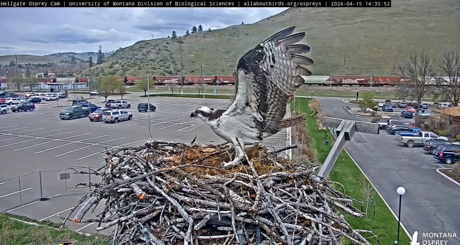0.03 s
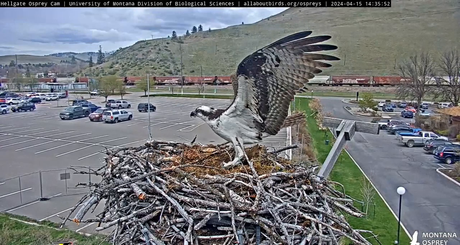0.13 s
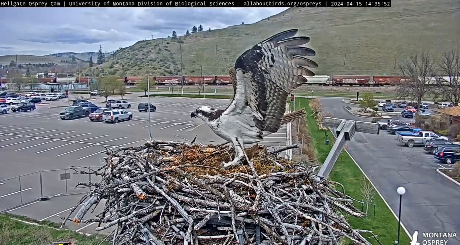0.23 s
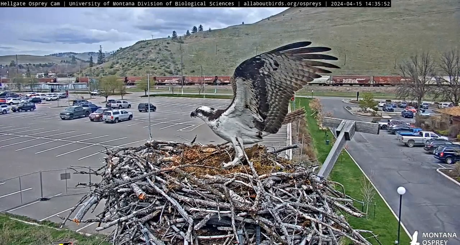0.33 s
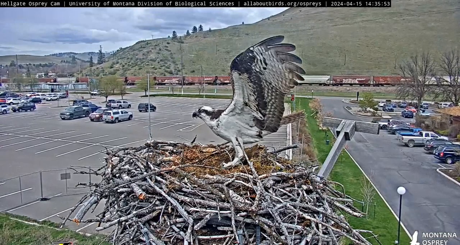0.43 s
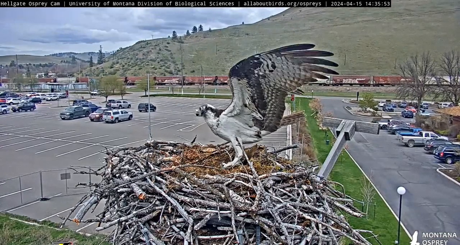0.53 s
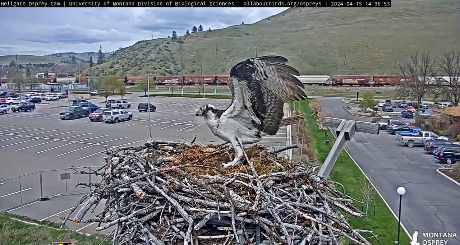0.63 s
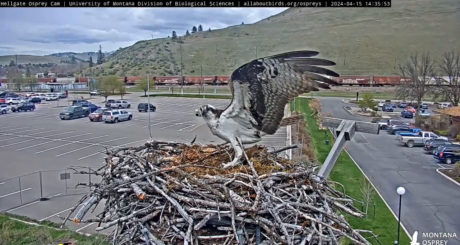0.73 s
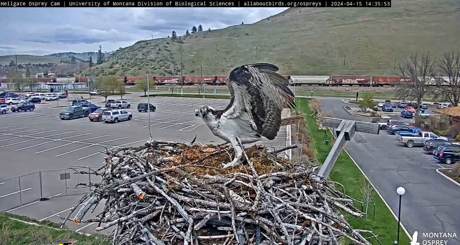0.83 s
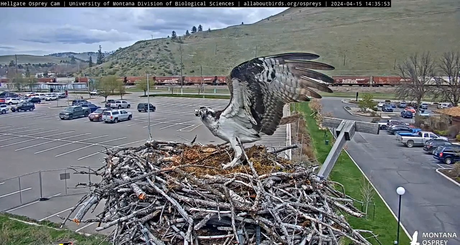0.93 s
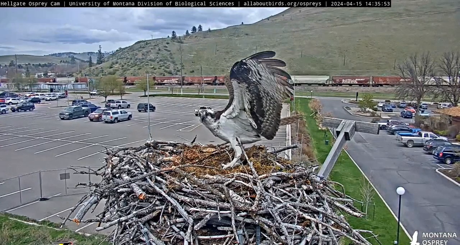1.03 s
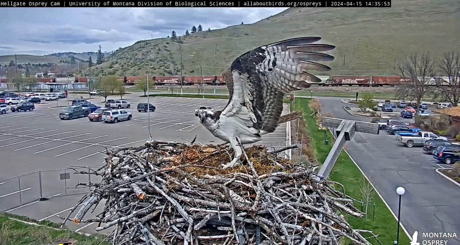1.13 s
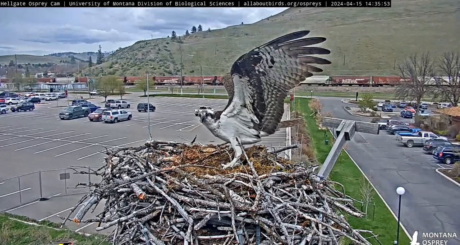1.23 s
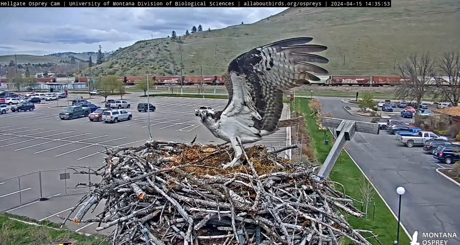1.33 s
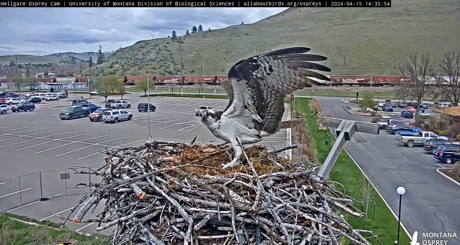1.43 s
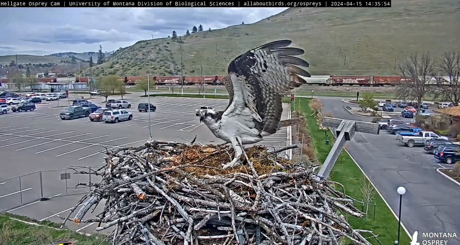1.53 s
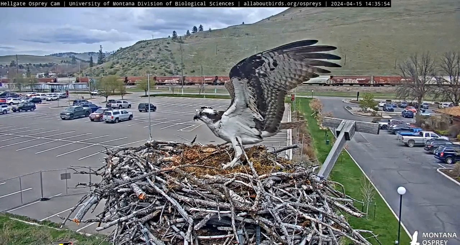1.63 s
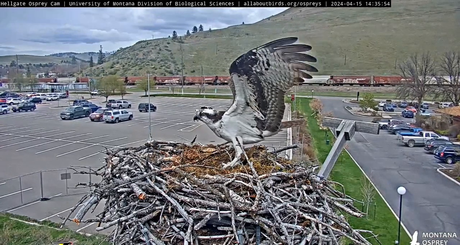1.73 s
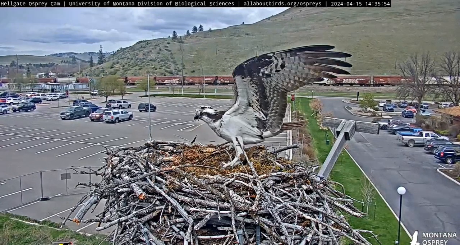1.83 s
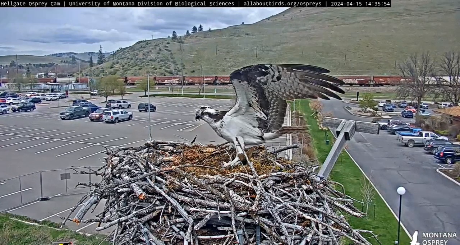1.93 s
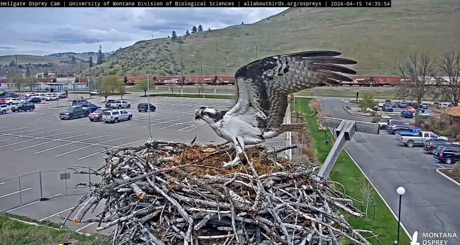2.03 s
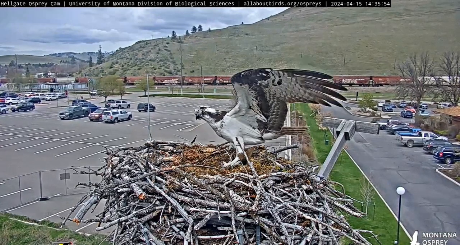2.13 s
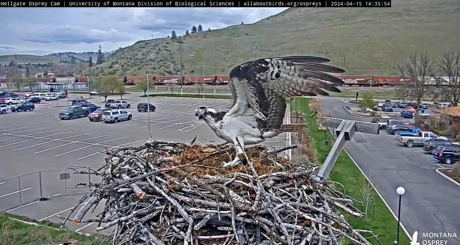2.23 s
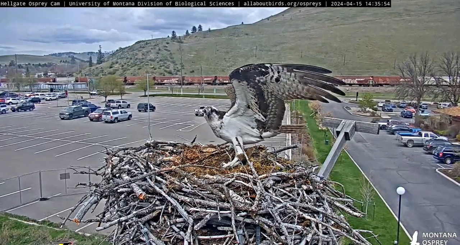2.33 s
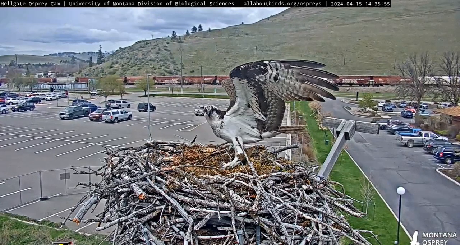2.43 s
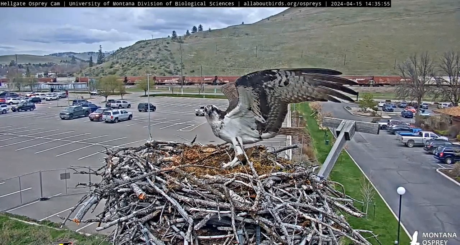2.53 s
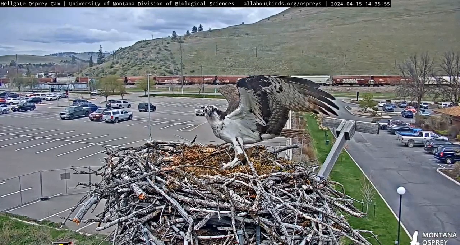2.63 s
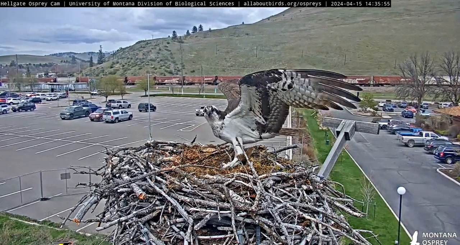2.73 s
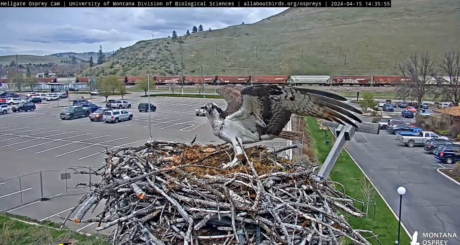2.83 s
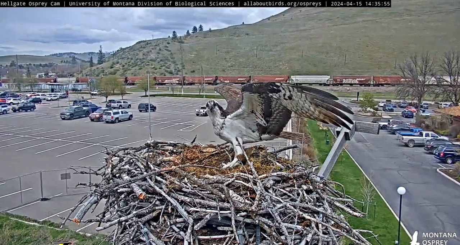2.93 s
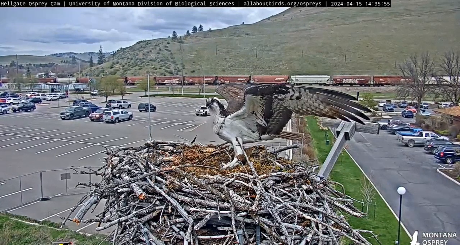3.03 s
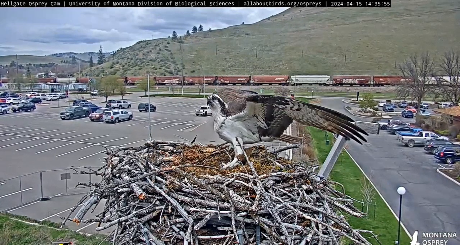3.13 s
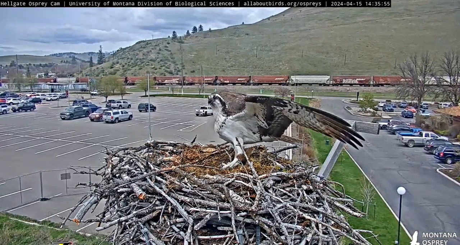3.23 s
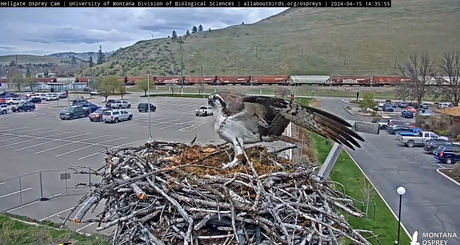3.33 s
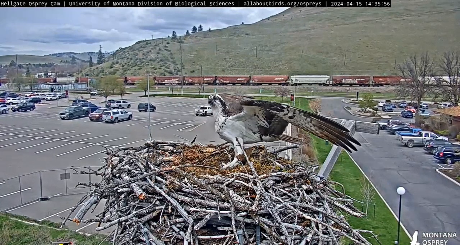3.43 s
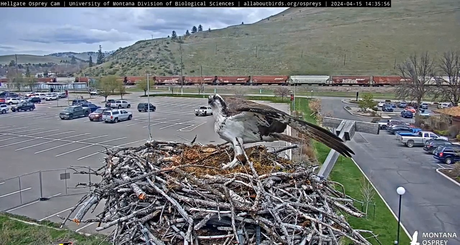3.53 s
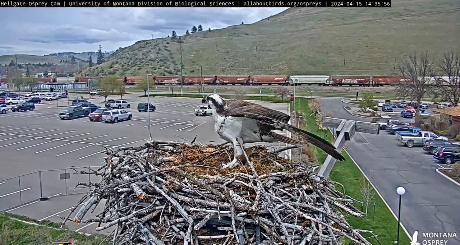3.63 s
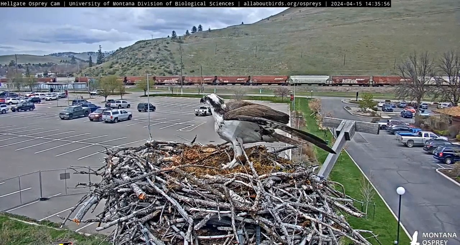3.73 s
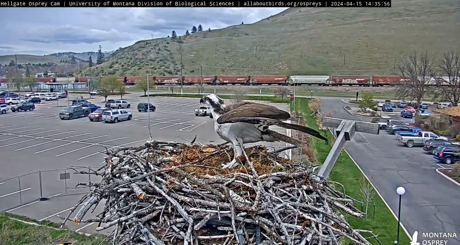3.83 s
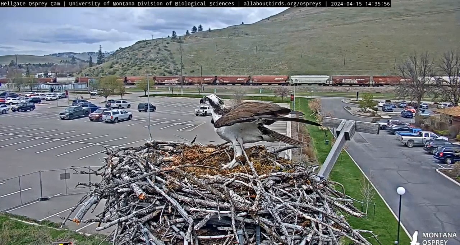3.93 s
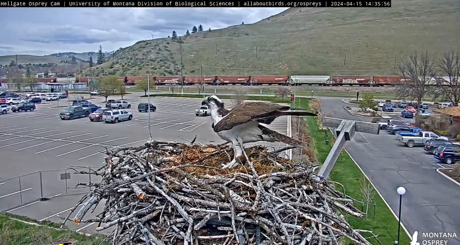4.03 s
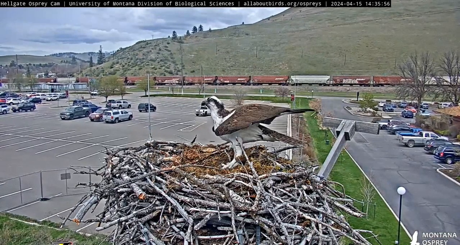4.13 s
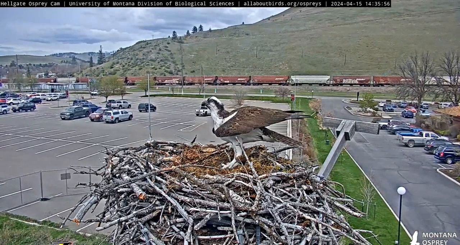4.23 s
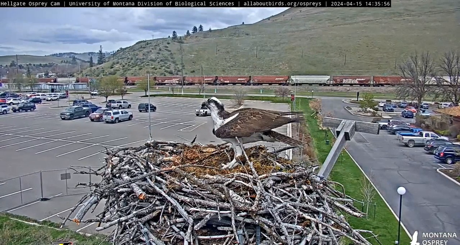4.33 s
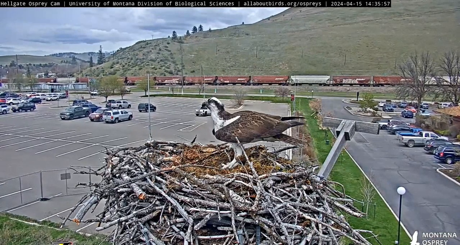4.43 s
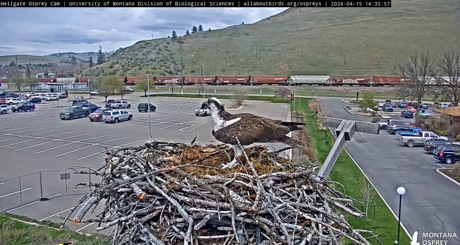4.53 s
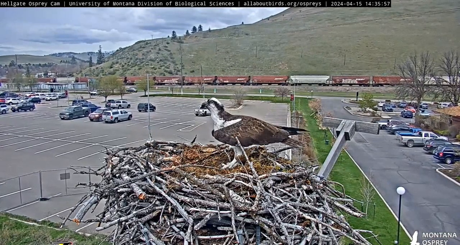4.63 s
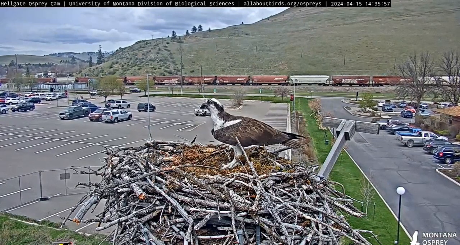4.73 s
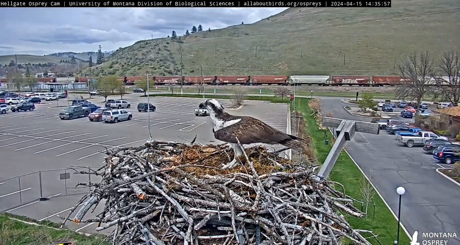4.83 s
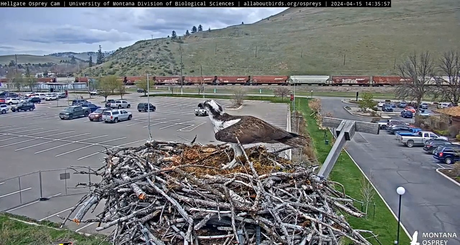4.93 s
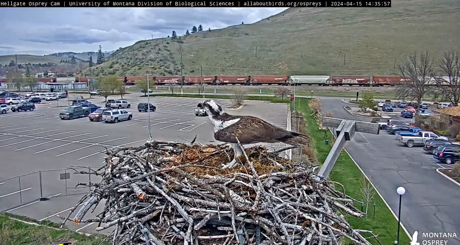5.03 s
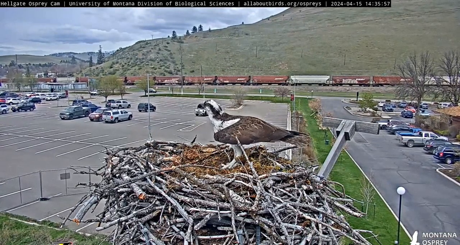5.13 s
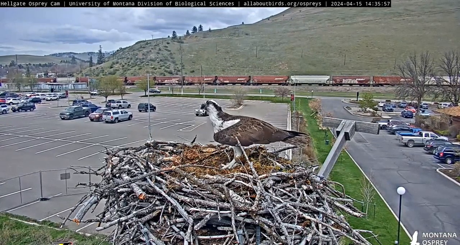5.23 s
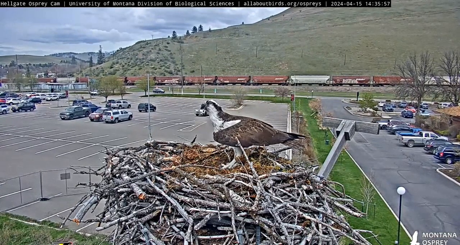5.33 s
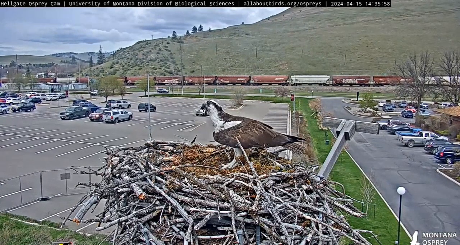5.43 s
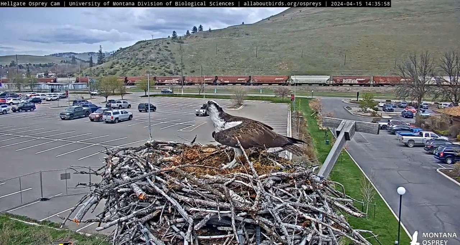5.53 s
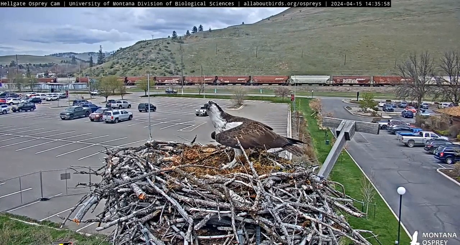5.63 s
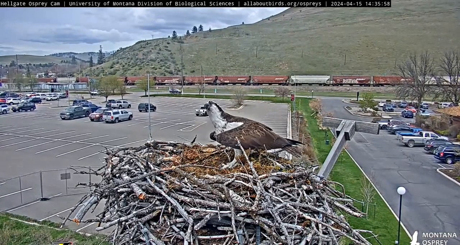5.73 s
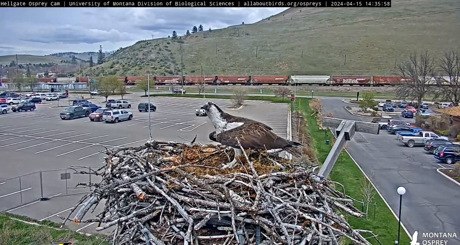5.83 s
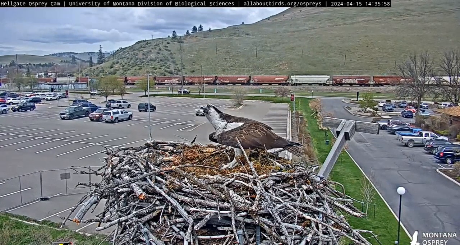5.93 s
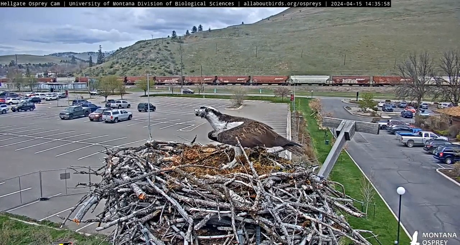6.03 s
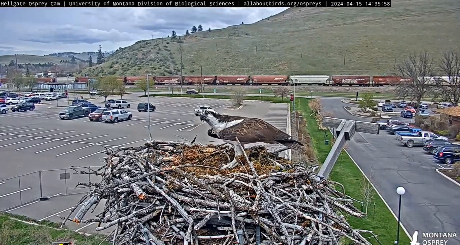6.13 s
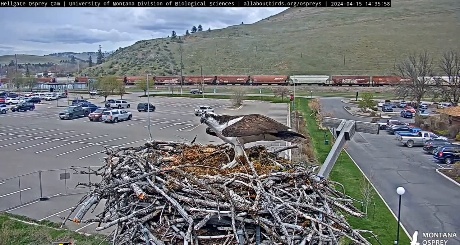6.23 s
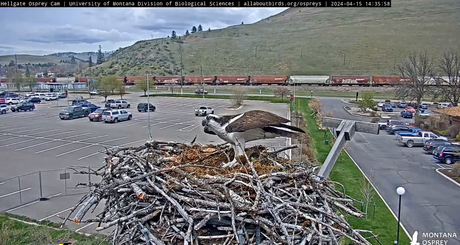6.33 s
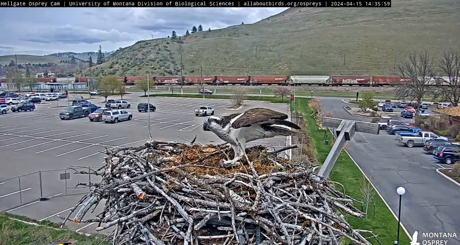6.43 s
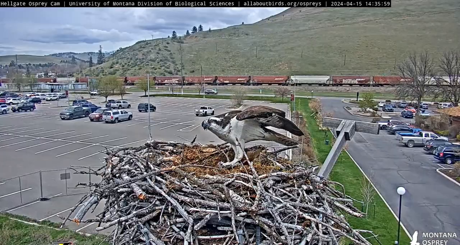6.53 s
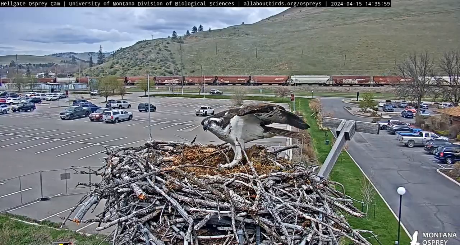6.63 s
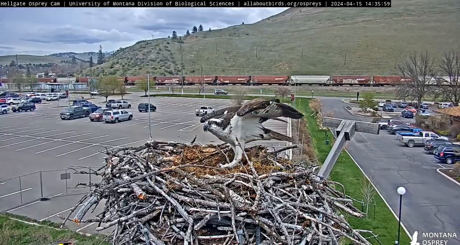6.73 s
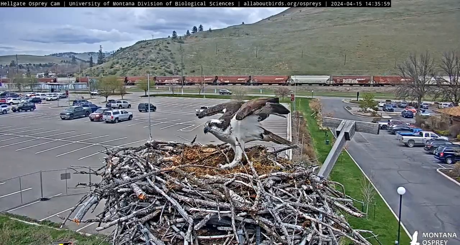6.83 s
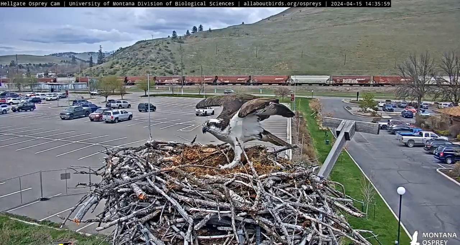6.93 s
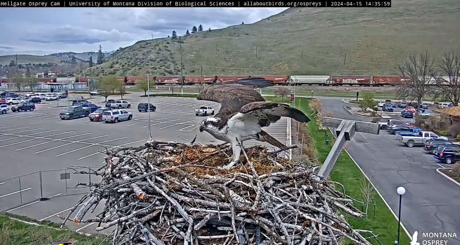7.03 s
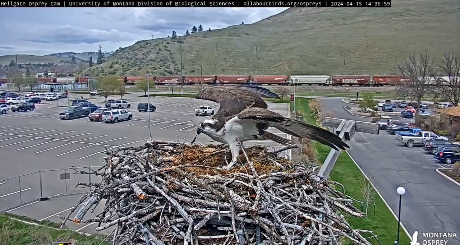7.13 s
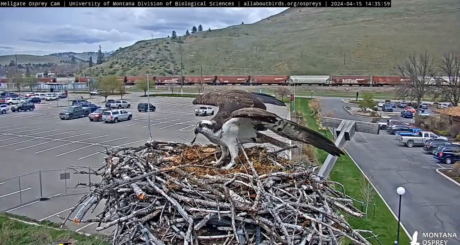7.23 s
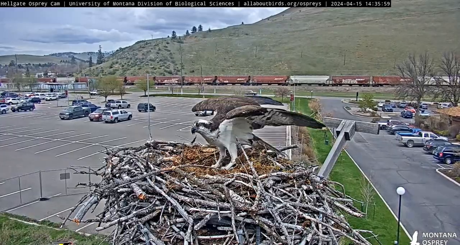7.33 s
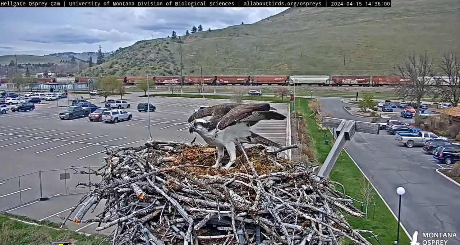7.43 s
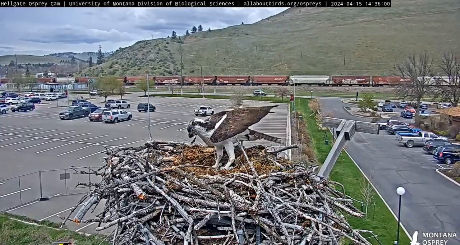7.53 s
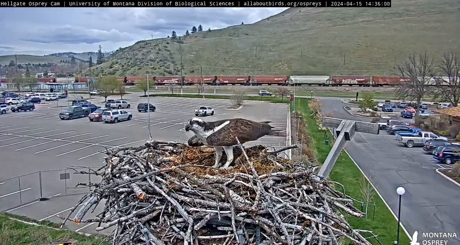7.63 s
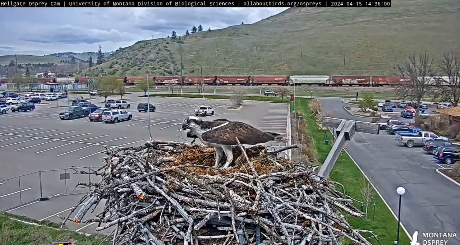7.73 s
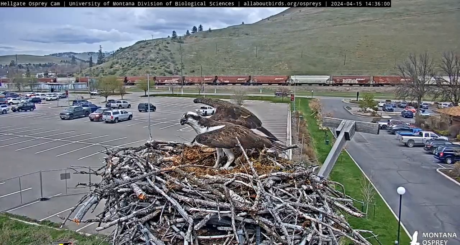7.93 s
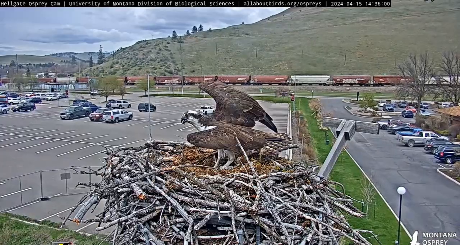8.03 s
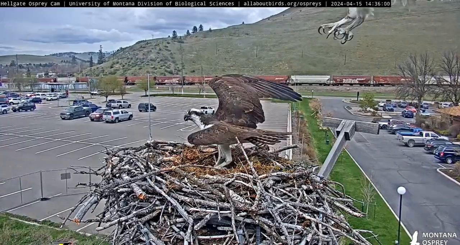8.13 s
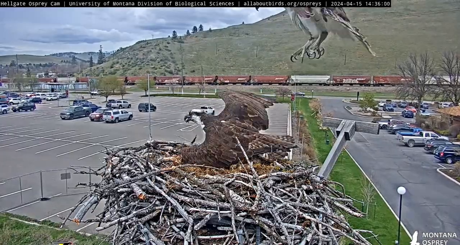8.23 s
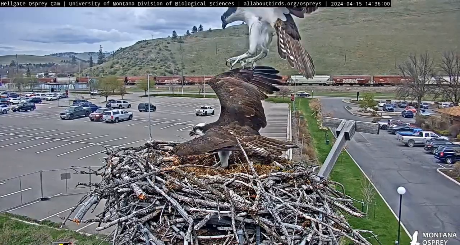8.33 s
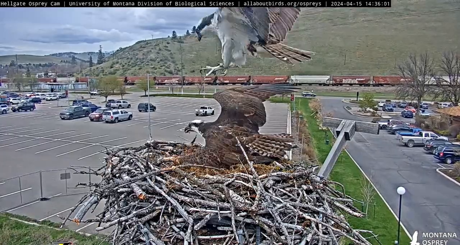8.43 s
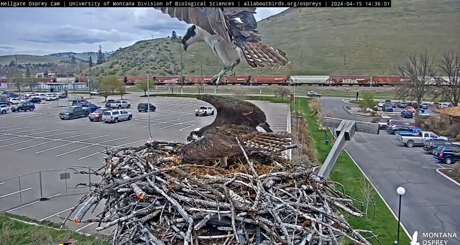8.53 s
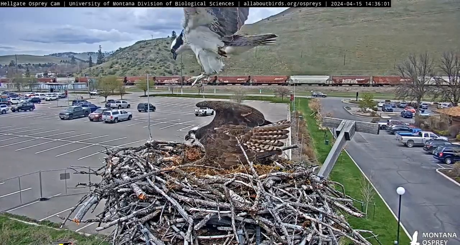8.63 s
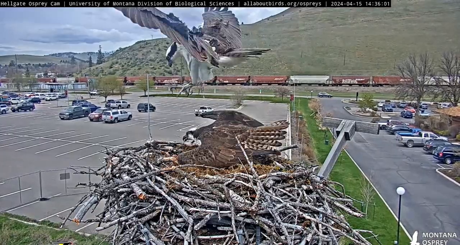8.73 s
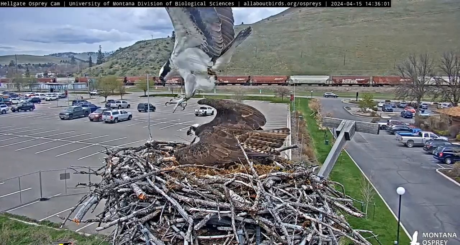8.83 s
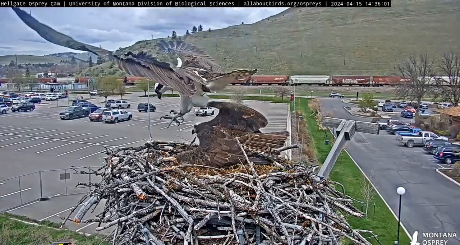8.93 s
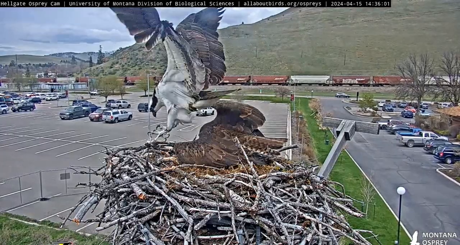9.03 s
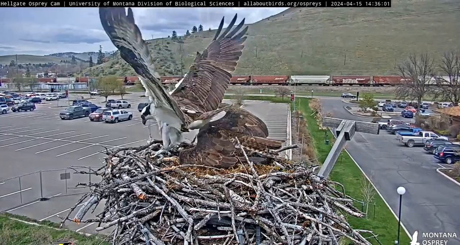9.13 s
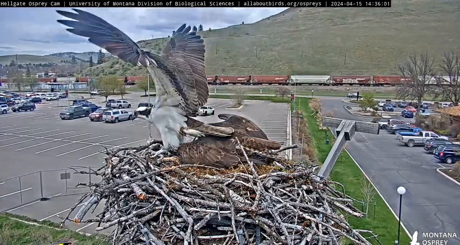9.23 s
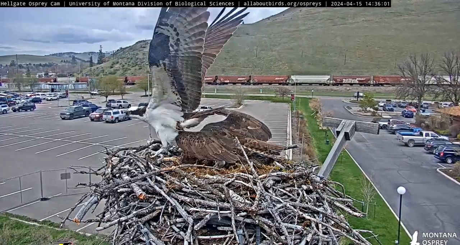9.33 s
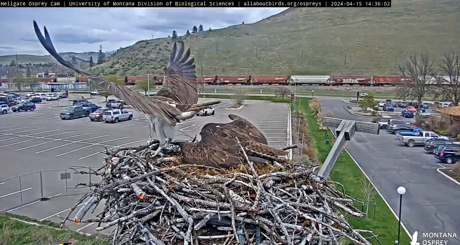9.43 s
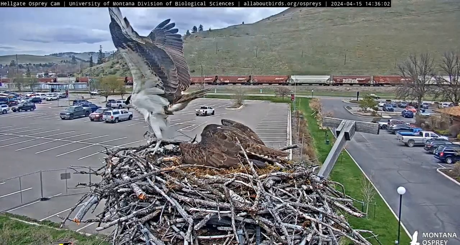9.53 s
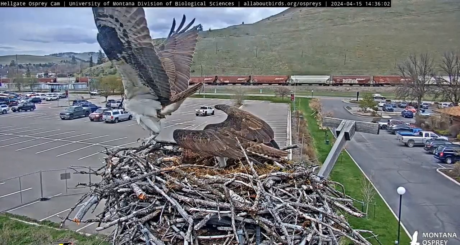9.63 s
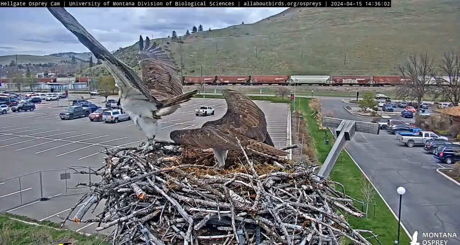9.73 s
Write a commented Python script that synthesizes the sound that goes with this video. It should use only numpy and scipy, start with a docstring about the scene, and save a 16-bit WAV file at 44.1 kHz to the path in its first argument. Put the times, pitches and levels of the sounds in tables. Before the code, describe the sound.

Outdoors, wind rumbles unevenly on the microphone and hums on its mount, above the faint wash of a distant town. Close by, an osprey whistles gently a handful of times, then grows excited and calls in quick, sharp yelps, about four a second, raspy at first and then smoother, mixed with brief upward squeaks. Nest twigs tick faintly twice as the calling goes on.

```python
"""An osprey on its nest, close to the nest camera's microphone: soft whistles, then a fast run of yelps
as its mate flies in. Each yelp slides down into a held note, at first a rapid trill as the two sides of
the syrinx beat together. Short rising squeaks come between the yelps, and twigs tick in the nest.
Gusts rumble on the microphone and sing on its mount, over the wash of a town far below."""
import sys
import numpy as np
from scipy.fft import rfft, irfft
from scipy.io import wavfile

SR = 44100
rng = np.random.default_rng(int(sys.argv[2]) if len(sys.argv) > 2 else 0)


def file_out(sig):
    """Save sig as 16-bit WAV at sys.argv[1]."""
    # one column per channel
    cols = np.atleast_2d(sig).T
    # limit, then scale
    lim = np.clip(cols, -1, 1)
    pcm = np.round(lim * 32767).astype(np.int16)
    wavfile.write(sys.argv[1], SR, pcm)


N = 429534

# The yelps. Each row: the slide's peak time and half length in seconds, pitch in Hz, level in dB;
# the held note's delay and release in seconds, pitch in Hz, level in dB, trill depth from 0 to 1.
YELPS = [(7.147, 0.0044, 2750, -25.5, 0.014, 0.0081, 2650, -34.5, 0.8),
         (7.394, 0.0062, 2960, -43.5, .009, .012, 2600, -50, .95),
         (7.651, 0.0046, 2760, -27.5, .007, 0.013, 2510, -44, 0.99),
         (7.887, 0.0054, 2784, -34, .012, 0.0059, 2650, -23.5, .95),
         (8.135, 0.0044, 2670, -33.5, 0.0099, 0.0055, 2574, -24.5, 0.7),
         (8.365, 0.0043, 2880, -30.5, 0.015, 0.0056, 2625, -25, 0.7),
         (8.588, 0.0047, 2950, -31, 0.014, 0.0088, 2590, -26.5, 0.62),
         (8.838, 0.0059, 2940, -27.5, .031, 0.0055, 2563, -27, 0),
         (9.083, 0.0074, 2790, -29.5, 0.013, 0.0084, 2635, -25, 0.3),
         (9.318, 0.0051, 2980, -30.5, .026, 0.0074, 2630, -35, 0),
         (9.56, 0.0044, 3100, -33.5, 0.016, .009, 2700, -35, 0)]
# Overtones come up as the bird grows excited. Each row: time in seconds, gain in dB.
EXCITEMENT = [(7.6, -10), (7.85, 1)]
# Overtone strength across the voice's range. Each row: pitch in Hz, gain in dB.
RICHNESS = [(2600, -2), (2900, -9.5), (3200, 2), (3550, 6.5), (4000, 19.5)]
# Breaks in the voice. Each row: peak time and half length in seconds, top pitch in Hz, level in dB,
# trill depth from 0 to 1.
VOICE_CRACKS = [(7.132, .014, 3910, -49, 0.1), (7.378, 0.015, 4220, -59.5, 0.12),
                (7.629, .012, 4820, -61, 0.16), (8.851, 0.0074, 3720, -33.5, .6),
                (9.334, 0.0051, 3600, -43.5, .5)]
# The squeaks. Each row: peak time in seconds, time stretch, base pitch in Hz, base level in dB.
SQUEAKS = [(7.108, 0.98, 3080, -44), (7.611, .7, 3690, -52), (7.841, .8, 3770, -61),
           (8.298, 0.88, 2840, -31.5), (8.51, 0.89, 2790, -26.5), (8.739, 0.87, 2970, -31.5),
           (8.989, 0.71, 3215, -34.5), (9.218, 0.45, 3140, -39.5), (9.465, 0.65, 2890, -34),
           (9.714, 0.47, 3100, -39.5)]
# One squeak before stretching. Each row: seconds from the peak, pitch ratio, gain in dB.
SQUEAK_SWEEP = [(-.006, .89, -27), (-.003, 0.95, -7), (0, 0.978, 2), (.005, 1.13, -6.5),
                (.009, 1.29, -14.5), (.012, 1.43, -33), (.02, 2.2, -38)]
# The whistles. Each row: start and length in seconds, top pitch in Hz, level in dB,
# octave gain in dB, lean (under 1 the top comes later).
WHISTLES = [(0.491, 0.073, 1943, -41.5, -7.5, 0.89), (1.254, 0.068, 1967, -41, -12.5, 1.07),
            (2.099, 0.068, 1910, -43, -7.5, 0.72), (2.857, 0.062, 1828, -48, -6, 1.14),
            (5.361, 0.075, 1897, -40.5, -11, 1.23), (6.499, 0.058, 1902, -45, -7.5, 1.13),
            (6.829, 0.021, 2340, -35, -27.5, 0.48)]
# One whistle's arch. Each row: share of its length, pitch ratio, gain in dB.
WHISTLE_ARCH = [(0, .94, -11), (.1, 0.98, -2.5), (.38, 1, 1), (.7, 0.97, 1), (.87, 0.904, -3.5),
                (1, 0.82, -18)]
# Twigs in the nest. Each row: start in seconds, level in dB.
TWIG_TICKS = [(9.174, -50.5), (9.64, -54.5)]
# Wind at the microphone. Each row: time in seconds, level in dB.
GUSTS = [(0.0, -59.5), (0.73, -63), (0.81, -53), (1.14, -49), (1.25, -51.5), (1.49, -43.5), (1.6, -57.5),
         (1.71, -47), (1.9, -50), (2.06, -60.5), (2.22, -48), (2.36, -52.5), (2.63, -44.5), (2.74, -64),
         (3.14, -62.5), (3.85, -53), (3.99, -60.5), (4.45, -61.5), (4.91, -44), (5.42, -49.5),
         (5.45, -55.5), (5.51, -46), (5.59, -51.5), (5.99, -42), (6.21, -47), (6.35, -59), (6.43, -50.5),
         (7.13, -46), (7.43, -64), (7.65, -54.5), (7.7, -66.5), (8.76, -65.5), (8.84, -45.5), (9.74, -51.5)]
# Wind singing on the mount. Each row: time in seconds, vortex rate in Hz, dB against the rumble.
MOUNT_SONG = [(0, 114.8, -19), (1.75, 107.3, -4), (2.6, 117.9, -16), (5.1, 121, -4.5), (5.7, 113, -1),
              (5.93, 133.7, 5.5), (6.25, 112, 2.5), (6.6, 116.8, 5), (7.0, 107.9, -7.5), (9.74, 104, -2.5)]
# That song's partials. Each row: multiple of the vortex rate, gain in dB.
VORTEX_PARTIALS = [(1, -8.5), (2, -3), (3, -6.5), (4, -12), (5, -18.5)]
# A far engine's tones. Each row: frequency in Hz, level at its nearest in dB.
ENGINE_TONES = [(136, -70), (206, -66.5)]
# Spectra of twigs, eddies, rumble and town. Each row: frequency in Hz, gain in dB.
TWIG_SPECTRUM = [(800, -12), (2800, -1), (7500, -8)]
EDDY_SPECTRUM = [(150, -13), (330, -1), (550, -7.5), (750, -12.5), (1100, -33), (2500, -50)]
RUMBLE_SPECTRUM = [(22, -36.5), (45, -5.5), (80, -0.5), (130, 2), (250, -1.5), (360, -6), (500, -12),
                   (700, -22), (1100, -36), (2500, -60.5)]
TOWN_SPECTRUM = [(22, -27), (50, 5.5), (140, -5), (300, -12.5), (550, -2.5), (900, 1), (1400, -2.5),
                 (2200, -7), (2500, -2.5), (2780, 0), (3150, -12.5), (4000, -18.5), (5500, -22),
                 (7900, -23)]  # the microphone housing resonates near 2.7 kHz
# The camera's mirror image in the top treble. Each row: frequency in Hz, gain in dB.
MIRROR_SPECTRUM = [(8000, -10), (12200, -17.5), (13300, -19), (14100, -23.5), (15300, -31)]


def yelps(waver, rest_hz=2390, ceiling_hz=5160, fall_s=.0058, slide_trill=.12):
    """Close up, each yelp slides into a held note: a raspy trill early in the run, smoother later."""
    out, rasp = np.zeros(N), .11 * walk(730)
    for s, width, hz, db, delay, release, held_hz, held_db, trill in YELPS:
        rich_db = np.interp(s, *np.transpose(EXCITEMENT))
        # the slide falls steeply towards a resting pitch
        i, t = around(s)
        pitch = np.minimum(rest_hz + (hz - rest_hz) * np.exp(-t / fall_s), ceiling_hz)
        swell = hump(t, .95 * width, width, power=3.1)
        out[i] += undb(db) * syrinx(t, pitch * waver[i], swell, slide_trill, rich_db - 5)
        # the smoother the held note, the sooner it speaks and the faster it sags
        i, t = around(s + delay)
        attack_s = np.interp(trill, [0, 1], [.0049, .006])
        sag_hz_per_s = np.interp(trill, [0, 1], [27000, 4050])
        pitch = held_hz - sag_hz_per_s * t
        swell = hump(t, attack_s, release, power=1.37)
        held = syrinx(t, pitch * waver[i], swell, trill, rich_db + 1)
        out[i] += undb(held_db) * (1 + trill * rasp[i]) * held
    return out


def syrinx(t, pitch, swell, trill, rich_db, trill_hz=235, swing=.061, octave_db=-26, third_db=-31):
    """One note; in a trill the two sides of the syrinx beat against each other, in step at t = 0."""
    beat = 2 * np.pi * trill_hz * t
    phase = turn(pitch - trill * trill_hz / 2)
    tone = (np.sin(phase) + trill * np.sin(phase + beat)) / np.sqrt(1 + trill ** 2)
    # overtones flutter with the beat and come up on hard pushes
    flutter = turn(pitch * (1 + swing * trill * (np.cos(beat) - 1)))
    richness = undb(np.interp(pitch, *np.transpose(RICHNESS)) + rich_db)
    overtones = undb(octave_db) * np.sin(2 * flutter) + undb(third_db) * np.sin(3 * flutter)
    return np.sqrt(2) * swell * (tone + richness * np.sqrt(swell) * overtones)


def voice_cracks(waver, register_foot_hz=3440):
    """The voice breaks into brief high arches: thin ahead of the first yelps, rough inside later ones."""
    out = np.zeros(N)
    for s, width, hz, db, trill in VOICE_CRACKS:
        i, t = around(s)
        pitch = hz - .5 * (hz - register_foot_hz) * (t / width) ** 2
        swell = hump(t, width, width, power=2)
        out[i] += undb(db) * syrinx(t, pitch * waver[i], swell, trill, rich_db=-10)
    return out


def squeaks(waver, octave_db=-40):
    """Nearly pure upward flicks between the yelps; the shorter ones climb less."""
    out = np.zeros(N)
    offset, ratio, sweep_db = np.transpose(SQUEAK_SWEEP)
    for s, stretch, hz, db in SQUEAKS:
        i, pitch, swell = note(s + offset * stretch, hz * ratio ** (stretch ** .5), db + sweep_db)
        phase = turn(pitch * waver[i])
        out[i] += swell * (np.sin(phase) + undb(octave_db) * np.sin(2 * phase))
    return out


def whistles(waver, third_db=-39, fourth_db=-36, full_arch_s=.07):
    """Relaxed arched notes, flatter when short, with an octave that drops out as the note dies."""
    out = np.zeros(N)
    share, ratio, arch_db = np.transpose(WHISTLE_ARCH)
    for s, length, hz, db, octave_db, lean in WHISTLES:
        times = s + share ** lean * length
        i, pitch, swell = note(times, hz * ratio ** (length / full_arch_s), db + arch_db)
        phase = turn(pitch * waver[i])
        gains = undb([octave_db, third_db, fourth_db])
        overtones = sum(gain * np.sin(k * phase) for k, gain in enumerate(gains, 2))
        out[i] += swell * (np.sin(phase) + swell / swell.max() * overtones)
    return out


def twigs(decay_s=.0012):
    """Tiny dry ticks near the microphone as the birds shift on the sticks."""
    t = np.arange(N) / SR
    bursts = sum(undb(db) * (t >= s) * np.exp(-abs(t - s) / decay_s) for s, db in TWIG_TICKS)
    return bursts * noise(TWIG_SPECTRUM)


def wind(flicker_db=2, eddy_growth=1.4, strong_gust_db=-46.5):
    """Gusts buffet the microphone and sing on its mount; stronger ones hold more bright eddies."""
    gust_db, = curves(GUSTS)
    vortex_hz, song_db = curves(MOUNT_SONG)
    eddy_db = -7 + eddy_growth * (gust_db - strong_gust_db)
    rumble = noise(RUMBLE_SPECTRUM) * undb(flicker_db * walk(22))
    eddies = noise(EDDY_SPECTRUM) * undb(eddy_db)
    song = mount_song(vortex_hz) * undb(song_db)
    # the three share the gust's energy
    total = np.sqrt(1 + undb(2 * eddy_db) + undb(2 * song_db))
    return undb(gust_db) * (rumble + eddies + song) / total


def mount_song(vortex_hz, drift=.028, blur_hz=10):
    """The mount sheds vortices in a low hum; turbulence pushes each partial about on its own."""
    song = np.zeros(N)
    for k, db in VORTEX_PARTIALS:
        phase = turn(k * vortex_hz * (1 + drift * walk(7)))
        tone = (1 + .5 * walk(blur_hz)) * np.sin(phase)
        blur = .72 * walk(blur_hz) * np.cos(phase)
        song += undb(db) * (tone + blur)
    return song


def town(wash_db=-57, swell_db=.58, nearest_s=7.65, passing_s=.68):
    """Far below the nest, a smooth wash of traffic and one faint engine that comes and goes."""
    wash = noise(TOWN_SPECTRUM) * undb(wash_db - swell_db * walk(2))
    speed = 1 + .0063 * walk(4.4)
    drone = sum(np.sin(turn(hz * speed)) * undb(db + 2 * walk(2.6)) for hz, db in ENGINE_TONES)
    distance = np.hypot(1, (np.arange(N) / SR - nearest_s) / passing_s)
    return wash + drone / distance


def undb(db):
    """Decibels to gain."""
    return 10 ** (np.asarray(db) / 20)


def unit(x):
    """Scale to an rms of one."""
    return x / np.sqrt(np.mean(x ** 2))


def curves(rows):
    """Each column after the time, joined by straight lines over the whole scene."""
    s, *columns = np.transpose(rows)
    return [np.interp(np.arange(N) / SR, s, c) for c in columns]


def colour(x, spectrum):
    """Filter by a spectrum of (Hz, dB) points."""
    hz, db = np.transpose(spectrum)
    bins = np.maximum(np.arange(N // 2 + 1) * SR / N, 1)
    return irfft(rfft(x) * undb(np.interp(np.log(bins), np.log(hz), db)), N)


def noise(spectrum):
    """Coloured noise with an rms of one."""
    return unit(colour(rng.standard_normal(N), spectrum))


def below(x, hz):
    """Very steep low-pass."""
    return irfft(rfft(x) * (np.arange(N // 2 + 1) * SR / N < hz), N)


def walk(rate_hz):
    """Smooth random motion with a spread of one."""
    bins = np.arange(N // 2 + 1) * SR / N
    return unit(irfft(rfft(rng.standard_normal(N)) * np.exp(-(bins / rate_hz) ** 2), N))


def turn(hz):
    """Running phase of a moving frequency."""
    return 2 * np.pi * np.cumsum(hz) / SR


def note(s, hz, db, fade_s=.001):
    """Sample indices, pitch and rounded amplitude of one note through its points."""
    i = np.arange(int(s[0] * SR), min(int(s[-1] * SR), N))
    swell = np.interp(i / SR, s, np.cbrt(undb(db))) ** 3
    fade = np.clip(np.minimum(i - i[0], i[-1] - i) / (fade_s * SR), 0, 1)
    return i, np.interp(i / SR, s, hz), np.sqrt(2) * swell * fade


def hump(t, attack_s, release_s, power):
    """A rounded swell that peaks at t = 0."""
    return np.exp(-abs(t / np.where(t < 0, attack_s, release_s)) ** power)


def around(s, reach_s=.035):
    """Sample indices near a moment, and their time from it."""
    i = np.arange(int((s - reach_s) * SR), min(int((s + reach_s) * SR), N))
    return i, i / SR - s


def scene(rasp=.048, calm_waver=.004, excited_waver=.0098):
    """One microphone at the nest in open air: the bird close by, twigs, wind and the town far below."""
    jitter, grain = walk(500), 1 + rasp * walk(1100)
    calm, excited = 1 + calm_waver * jitter, 1 + excited_waver * jitter
    osprey = whistles(calm) + squeaks(calm) + grain * (yelps(excited) + voice_cracks(excited))
    return (osprey + twigs() + wind() + town())[None]


def record(dry, camera_rate_hz=16000, top_hz=15400):
    """The nest camera samples slowly, which adds a thin mirror image of the sound in the top treble."""
    sound = below(dry[0], camera_rate_hz / 2)
    carrier = 2 * np.cos(2 * np.pi * camera_rate_hz * np.arange(N) / SR)
    image = colour(sound * carrier, MIRROR_SPECTRUM)
    return below(sound + image, top_hz)[None]


dry = scene()
out = record(dry)
file_out(out)
```